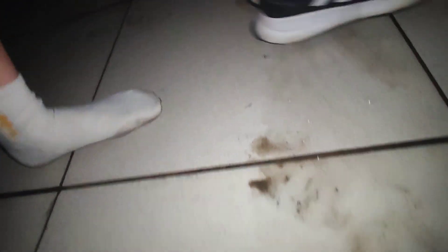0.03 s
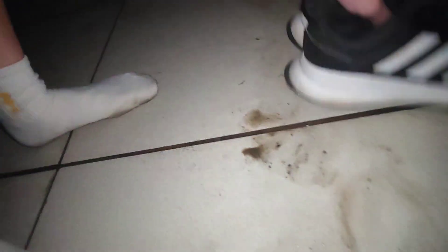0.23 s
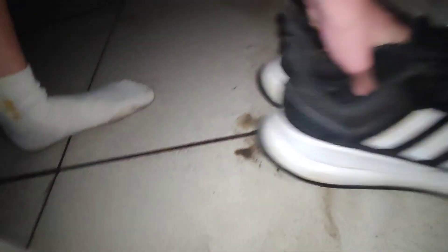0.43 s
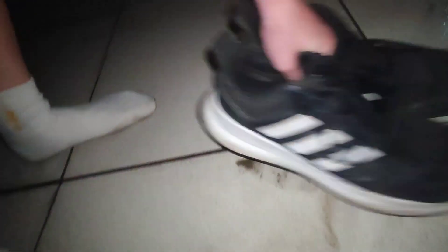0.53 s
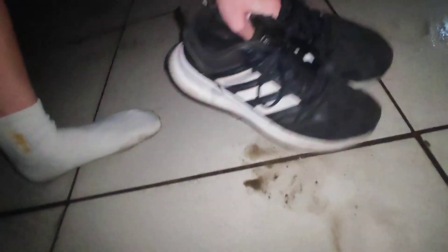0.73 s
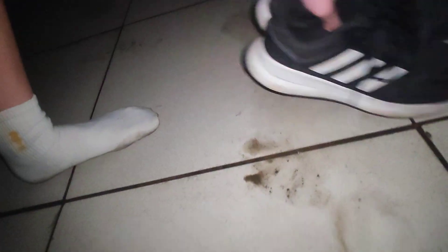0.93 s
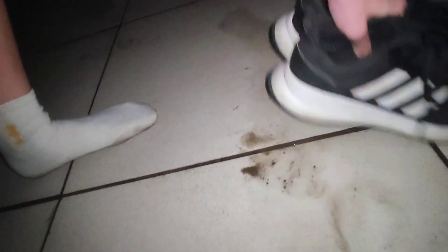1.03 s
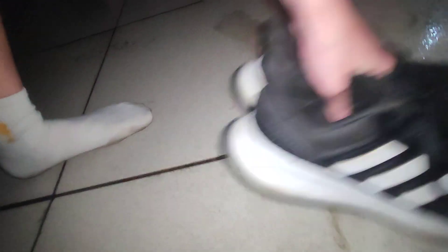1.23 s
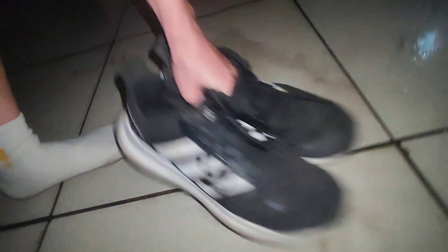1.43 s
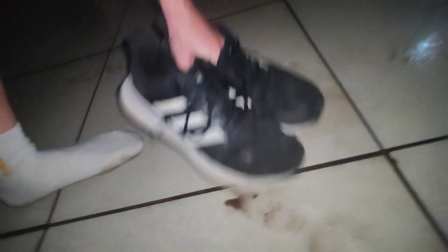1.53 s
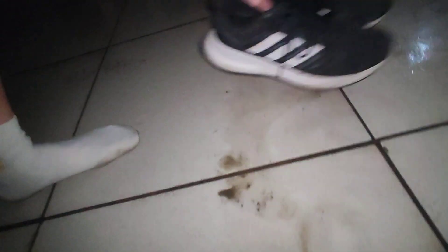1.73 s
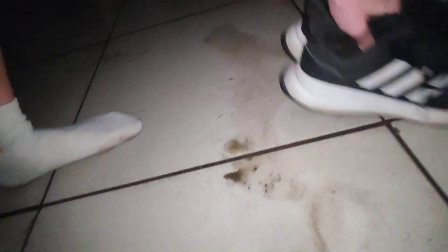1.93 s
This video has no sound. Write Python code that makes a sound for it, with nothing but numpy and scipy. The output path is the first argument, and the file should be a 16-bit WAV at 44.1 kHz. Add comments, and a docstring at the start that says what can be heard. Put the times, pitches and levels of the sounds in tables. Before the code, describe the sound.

Shoes scuff and scrape across a gritty tiled floor in two short bouts.

```python
"""Trainers scuff back and forth over a gritty tiled floor in two bouts, pushed by one hand.
The rubber soles chatter in tiny slips, grit hisses under them, and now and then an edge catches or taps.
Behind them: a small hard room, a low hum and handling rumble.
Two microphone ports hear the shoes from the left."""
import sys
import numpy as np
from scipy import signal
from scipy.fft import rfft, irfft
from scipy.io import wavfile
from scipy.ndimage import uniform_filter1d, map_coordinates

SR = 44100
rng = np.random.default_rng(int(sys.argv[2]) if len(sys.argv) > 2 else 0)


def store_pcm(level_fs):
    """Save levels as 16-bit WAV."""
    pcm = np.round(np.clip(level_fs, -1, 1) * 32767).astype(np.int16)
    wavfile.write(sys.argv[1], SR, np.atleast_2d(pcm).T)


N = 88200
T = np.arange(N) / SR
FREQ_HZ = np.fft.rfftfreq(N, 1 / SR)


def amp(db):
    """Decibels to gain."""
    return 10 ** (np.asarray(db) / 20)


def unit(x):
    """Scale to rms 1."""
    return x / np.sqrt(np.mean(x ** 2) + 1e-20)


def read(points, hz):
    """Interpolate a table on a log-frequency axis."""
    f, value = np.transpose(points)
    return np.interp(np.log(hz + 1), np.log(f + 1), value)


def add(mix, start_s, sound):
    """Mix a sound in at start_s."""
    part = mix[round(start_s * SR):][:len(sound)]
    part += sound[:len(part)]


def impulse_response(spectrum, size=4096):
    """Causal filter with the given spectrum."""
    log_gain = np.log(amp(read(spectrum, abs(np.fft.fftfreq(size, 1 / SR)))))
    return np.fft.ifft(np.exp(np.conj(signal.hilbert(log_gain)))).real[:size // 2]


def colour(x, spectrum):
    """Filter x; white noise keeps its power."""
    fir = impulse_response(spectrum)
    return signal.fftconvolve(x, fir / np.linalg.norm(fir))[:N]


def wobble(rate_hz):
    """Random fluctuation up to rate_hz, rms 1."""
    return unit(irfft(rfft(rng.standard_normal(N)) / (1 + (FREQ_HZ / rate_hz) ** 4), N))


def swell(peak_s, sigma_s):
    """Gaussian envelope."""
    return np.exp(-.5 * ((T - peak_s) / sigma_s) ** 2)


def background():
    """Room air, a wavering hum and the rumble of handling."""
    # noise spectra: freq_hz, relative_db
    air_spectrum = [(15, -49), (25, -11), (58, -17), (82, -5.5), (120, -2), (153, -10.5), (229, -5.5),
                    (463, -23), (607, -18), (659, -20.5), (988, -24.5), (1840, -26.5), (2000, -20),
                    (2840, -27.5), (3250, -27.5), (5140, -40), (16000, -52.5)]
    rumble_spectrum = [(20, -6), (50, 1), (90, 3), (140, 3.5), (200, -7), (290, -2.5), (450, -11.5),
                       (1200, -38.5)]
    # left-right likeness: freq_hz, correlation
    likeness = [(30, 0.26), (70, 0.95), (150, 0.93), (300, 0.9), (700, 0.15), (2000, 0), (10000, 0.058)]
    # hum lines: pitch_hz, level_db
    hum_lines = [(120, -57.5), (181, -66), (673, -70), (1933, -71)]
    # rumble envelope: time_s, level_db
    handling = [(0, -52.5), (0.22, -55), (0.37, -48), (0.5, -50), (0.63, -52), (0.75, -47.5), (0.87, -49),
                (1.0, -52), (1.1, -56.5), (1.3, -51), (1.4, -46), (1.5, -49), (1.68, -47), (1.82, -48),
                (1.95, -56), (1.98, -50), (2.0, -51)]
    air_db, waver_hz = -51, 4
    same = read(likeness, FREQ_HZ)

    def stereo_noise(spectrum):
        left, other = rfft(rng.standard_normal((2, N)))
        right = same * left + np.sqrt(1 - same ** 2) * other
        return unit(irfft(np.array([left, right]) * amp(read(spectrum, FREQ_HZ)), N))

    out = amp(air_db) * stereo_noise(air_spectrum)
    out += amp(np.interp(T, *np.transpose(handling))) * stereo_noise(rumble_spectrum)
    for pitch_hz, level_db in hum_lines:
        cycles = np.cumsum(pitch_hz + waver_hz * wobble(rate_hz=16.3)) / SR
        out += amp(level_db) * np.sqrt(2) * np.sin(2 * np.pi * cycles)
    return out


def bump():
    """Soft, low knock of handling: a fast-damped sine."""
    # knock: start_s, level_db, pitch_hz
    knocks = [(1.972, -33, 88)]
    rise_s = 0.0032
    out, t = np.zeros(N), T[:SR // 5]
    envelope = t / rise_s * np.exp(1 - t / rise_s)
    for start_s, level_db, pitch_hz in knocks:
        add(out, start_s, amp(level_db) * envelope * np.sin(2 * np.pi * pitch_hz * t))
    return out


def scattered(x, lag_s=.002):
    """Direct sound plus a late part, scattered by the floor and the moving shoes."""
    # scattered part: freq_hz, power_share
    shares = [(150, 0.05), (400, 0.06), (700, 0.38), (1700, 0.14), (2800, 0.55), (6000, 0.34),
              (10000, 0.87), (16000, 0.8)]
    share = read(shares, FREQ_HZ)
    frames = signal.stft(x, nperseg=256)[2]
    random_phase = np.exp(2j * np.pi * rng.random(frames.shape))
    paths = signal.istft(frames * random_phase, nperseg=256)[1][:N]
    late = rfft(unit(paths) * np.std(x)) * np.exp(-2j * np.pi * FREQ_HZ * lag_s)
    return irfft(np.sqrt(1 - share) * rfft(x) + np.sqrt(share) * late, N)


def room(x, tail_db=-13, build_s=0.011):
    """Sound at one port: direct, scattered and the room's tail."""
    # reverberation: freq_hz, t60_s
    decay_times = [(150, 0.92), (800, 0.33), (2200, 0.48), (5500, 0.26), (14000, 0.18)]
    t = T[:SR // 2]
    hz, age_s, frames = signal.stft(rng.standard_normal(len(t)), SR, nperseg=256)
    decay = np.exp(-np.log(1000) * age_s / read(decay_times, hz)[:, None])
    tail = signal.istft(frames * decay, nperseg=256)[1][:len(t)] * np.minimum(t / build_s, 1)
    return scattered(x) + amp(tail_db) * signal.fftconvolve(x, tail / np.linalg.norm(tail))[:N]


def contact(attack_s=0.0024, release_s=0.0029):
    """1 while the soles are on the floor, 0 when lifted."""
    # floor contact: touch_s, lift_s
    spans = [(0.2305, 0.857), (1.064, 1.75)]
    return sum(np.clip((T - touch_s) / attack_s, 0, 1) * np.exp(-np.maximum(T - lift_s, 0) / release_s)
               for touch_s, lift_s in spans)


def slips(rate_hz=5000, spread_db=3.5, smooth_share=0.82):
    """Dense tiny slips of uneven size over a smooth rub."""
    size = amp(spread_db * np.minimum(rng.exponential(1, N), 4))
    clicks = rng.choice([-1, 1], N) * size * (rng.random(N) < rate_hz / SR)
    return np.sqrt(1 - smooth_share) * unit(clicks) + np.sqrt(smooth_share) * rng.standard_normal(N)


def drift(x, depth_db=1.5, width_hz=1100, span_s=0.071):
    """The friction's colour drifts from patch to patch of the floor."""
    frames = signal.stft(x, nperseg=256)[2]
    field = rng.standard_normal(frames.shape[::-1]).T
    field = uniform_filter1d(field, round(width_hz * 256 / SR), axis=0)
    field = uniform_filter1d(field, round(span_s * SR / 128), axis=1)
    return signal.istft(frames * amp(depth_db * unit(field)), nperseg=256)[1][:N]


def ring(hz, width_hz):
    """Impulse response of a damped rubber resonance."""
    t = T[:SR // 100]
    return t * np.exp(-np.pi * width_hz * t) * np.cos(2 * np.pi * hz * t)


def sand():
    """Brief bright hiss where a sole crosses loose sand."""
    # sand patches: peak_s, sigma_s, level_db
    patches = [(0.384, 0.0051, -28.5), (0.442, 0.015, -37), (0.795, .03, -54), (1.068, 0.0034, -51),
               (1.248, 0.028, -42.5)]
    # hiss spectrum: freq_hz, relative_db
    spectrum = [(2000, -22.5), (4000, 2), (7000, -1), (9500, -5), (12000, -7), (16000, -18)]
    envelope = sum(amp(level_db) * swell(peak_s, sigma_s) for peak_s, sigma_s, level_db in patches)
    return colour(slips() * envelope, spectrum)


def swishes():
    """Fine slips briefly ring one resonance of the tread."""
    # swishes: peak_s, sigma_s, level_db, resonance_hz
    events = [(0.265, 0.052, -37.5, 5740), (0.399, 0.0028, -29.5, 5800), (0.46, 0.018, -40.5, 4060),
              (0.665, 0.019, -49.5, 6040), (0.85, 0.0034, -39, 4230), (1.11, 0.018, -46.5, 6500),
              (1.15, 0.034, -43.5, 3650), (1.264, 0.027, -40.5, 5600), (1.31, 0.032, -44.5, 2290),
              (1.455, 0.027, -43.5, 2500)]
    out, rub = np.zeros(N), slips()
    for peak_s, sigma_s, level_db, resonance_hz in events:
        tread = signal.oaconvolve(rub, ring(resonance_hz, width_hz=1120))[:N]
        out += amp(level_db) * unit(tread) * swell(peak_s, sigma_s)
    return out * contact()


def taps(thud_decay_s=0.0049, click_decay_s=0.0019):
    """A sole taps the tile: soft thud, gritty click."""
    # taps: start_s, thud_energy_db, click_energy_db
    hits = [(0.372, -8, -20), (0.604, -25, -12.5), (0.621, -11.5, -14), (0.640, -17, -23),
            (1.0639, -10, -13), (1.097, -13, -19), (1.238, -13.5, -7.5), (1.399, -22, -11),
            (1.744, -34, -17)]
    # tap spectra: freq_hz, relative_db
    thud_spectrum = [(60, -13), (150, 0), (330, 3.5), (600, -1.5), (1000, -6), (2500, -23), (8000, -64)]
    click_spectrum = [(200, 5), (800, -7.5), (2200, -0.5), (4000, -9), (6200, -3.5), (9000, -15),
                      (16000, -12)]
    thuds, clicks, t = np.zeros(N), np.zeros(N), T[:SR // 20]
    for start_s, thud_db, click_db in hits:
        for mix, db, decay_s in ((thuds, thud_db, thud_decay_s), (clicks, click_db, click_decay_s)):
            burst = rng.standard_normal(len(t)) * np.exp(-t / decay_s)
            add(mix, start_s, amp(db) * burst / np.linalg.norm(burst))
    return colour(thuds, thud_spectrum) + colour(clicks, click_spectrum)


def catches(judder_hz=480):
    """A sole's edge catches: uneven stick-slip pulses ring the rubber."""
    # catches: start_s, length_s, level_db, resonance_hz
    events = [(0.275, .012, -27, 2100), (0.297, .014, -30, 2230), (0.321, 0.0081, -27, 2000),
              (0.343, 0.014, -26, 1880), (0.372, 0.0044, -29.5, 1960), (0.396, .012, -26.5, 2000),
              (0.785, 0.0074, -36, 1830), (1.598, .027, -34.5, 1580), (1.676, 0.022, -35, 1660)]
    cycles = np.cumsum(judder_hz * np.exp(.45 * wobble(rate_hz=500))) / SR
    pulses = np.diff(np.floor(cycles), prepend=0) * rng.uniform(0.56, 1, N)
    out = np.zeros(N)
    for start_s, length_s, level_db, resonance_hz in events:
        force = np.r_[1, pulses[round(start_s * SR):round((start_s + length_s) * SR)]]
        judder = np.convolve(force, ring(resonance_hz, width_hz=890))
        add(out, start_s, amp(level_db) * judder * np.sqrt(length_s * SR) / np.linalg.norm(judder))
    return out


def soles(chatter_hz=169, shared_chatter_db=0.5, own_chatter_db=1.44):
    """Sliding friction: dull drag, tread rasp and grit hiss chatter while the soles touch the floor."""
    # layer envelopes before trim: time_s, drag_db, rasp_db, grit_db
    first_bout = [(0.236, -37, -38, -37.5), (0.284, -38, -30, -38.5), (0.294, -32.5, -29, -43),
                  (0.348, -31.5, -25, -35.5), (0.394, -35.5, -32, -36), (0.458, -39, -32, -46),
                  (0.516, -45, -47, -50), (0.566, -46, -40.5, -49.5), (0.6, -46, -39.5, -42),
                  (0.642, -36, -34, -49), (0.648, -39.5, -38, -53), (0.724, -44.5, -40, -55),
                  (0.814, -46, -37.5, -38.5), (0.832, -55, -46, -60), (0.844, -48, -55, -39.5),
                  (0.857, -46, -52, -55)]
    second_bout = [(1.068, -50.5, -47.5, -48.5), (1.086, -53, -49, -47), (1.098, -46.5, -40, -45),
                   (1.152, -54, -42.5, -44), (1.19, -48.5, -43, -41.5), (1.246, -46.5, -36.5, -36),
                   (1.346, -47, -42.5, -57), (1.394, -44.5, -36.5, -47), (1.462, -42.5, -38.5, -50),
                   (1.57, -44.5, -47, -49), (1.602, -45, -34.5, -41.5), (1.616, -44, -35, -46.5),
                   (1.652, -47.5, -44.5, -40), (1.69, -46, -68, -39.5), (1.706, -52, -49, -46.5),
                   (1.73, -48, -42, -48), (1.746, -45.5, -39, -39.5), (1.75, -52, -64, -68)]
    # layer spectra: freq_hz, relative_db
    drag = [(100, -24), (250, -8), (450, -6), (780, 1), (1100, 0), (1600, 3), (2000, -11.5), (3000, -17),
            (6000, -50)]
    rasp = [(800, -24.5), (1400, -16.5), (1850, -2), (2250, 4.5), (2600, 0), (3100, -13), (4200, -8.5),
            (6000, -22.5), (12000, -45.5)]
    grit = [(1000, -28), (2500, -1.5), (3600, 1), (4800, -3.5), (6200, 0), (7600, -6), (9200, -5.5),
            (12000, -8.5), (16000, -20.5)]
    trims_db = (3, 0.82, 1.5)
    time_s, *levels_db = np.transpose([*first_bout, *second_bout])
    shared_db = shared_chatter_db * wobble(chatter_hz)
    out = np.zeros(N)
    for level_db, spectrum, trim_db in zip(levels_db, (drag, rasp, grit), trims_db):
        force = unit(drift(slips()) * amp(shared_db + own_chatter_db * wobble(chatter_hz)))
        envelope = contact() * amp(trim_db + np.interp(T, time_s, level_db))
        out += colour(force * envelope, spectrum)
    return out


def scene():
    """The shoes' sound reaches the left port first; each port has its own colour and reflections."""
    # shoe bearing as right-port lag: time_s, lag_ms
    bearing = [(0.25, 0.32), (0.45, 0.36), (0.8, 0.247), (1.1, 0.33), (1.5, 0.318), (1.62, 0.17),
               (1.75, 0.2)]
    # port responses: freq_hz, gain_db
    left_port = [(200, -7.5), (1000, 0.5), (1700, -2.5), (2250, -3.5), (3200, 0.5), (4800, 2), (6200, 1),
                 (7700, -0.5), (8900, 4.5), (11000, -2.5), (16000, 0.5)]
    right_port = [(200, -0.5), (1000, -1), (1700, 4), (2250, 3), (3200, -2), (4800, 1.5), (6200, 2.5),
                  (6800, 0), (7500, -7.5), (8900, -6), (10300, -5.5), (12000, -9), (14000, -4.5),
                  (16000, 4)]
    shoes = soles() + swishes() + sand() + catches() + taps()
    lag_s = np.interp(T, *np.transpose(bearing)) / 1000
    delayed = map_coordinates(shoes, [(T - lag_s) * SR], order=3)
    left = signal.fftconvolve(room(shoes), impulse_response(left_port))[:N]
    right = signal.fftconvolve(room(delayed), impulse_response(right_port))[:N]
    return np.array([left, right]) + background() + bump()


def record(dry):
    """Low-pass band limit."""
    cutoff_hz = 16000
    lowpass = signal.firwin(511, cutoff_hz, window=("kaiser", 9), fs=SR)
    return signal.oaconvolve(dry, lowpass[None], "same")


dry = scene()
out = record(dry)
store_pcm(out)
```